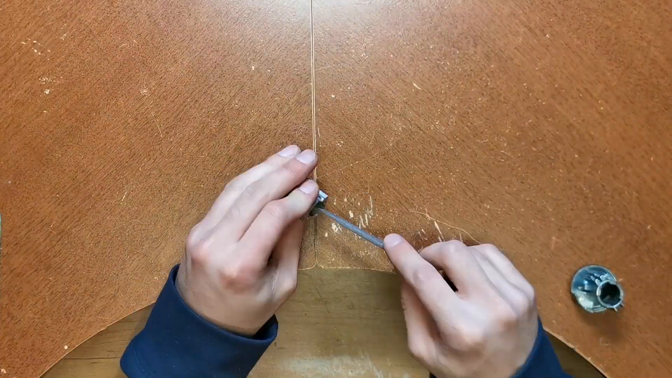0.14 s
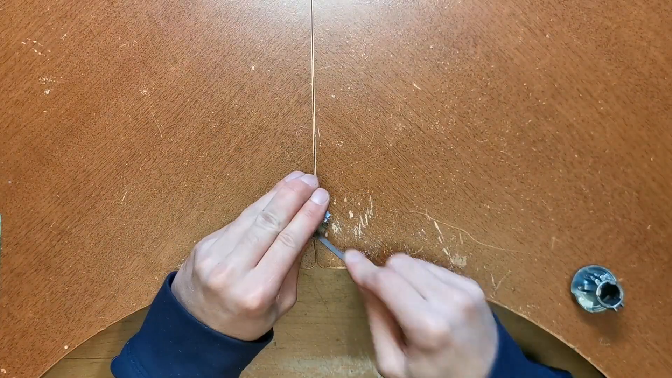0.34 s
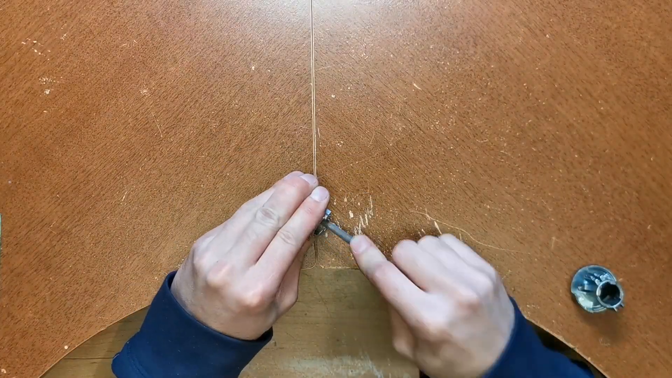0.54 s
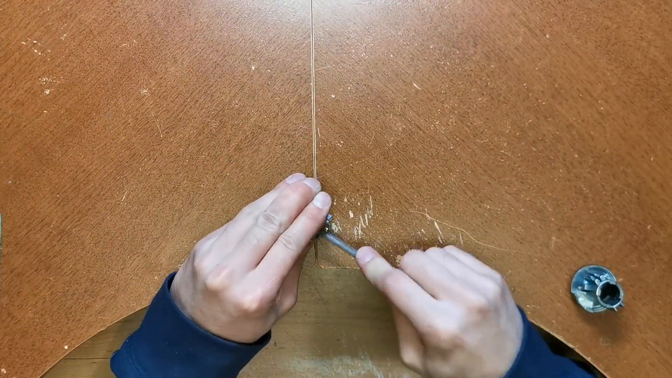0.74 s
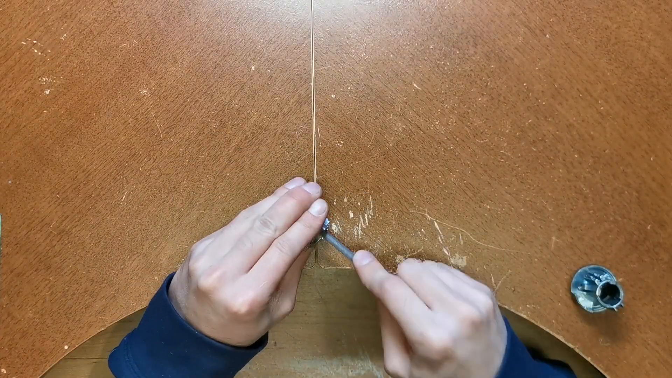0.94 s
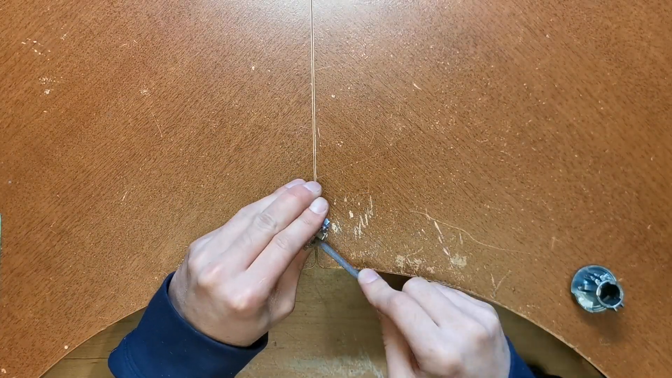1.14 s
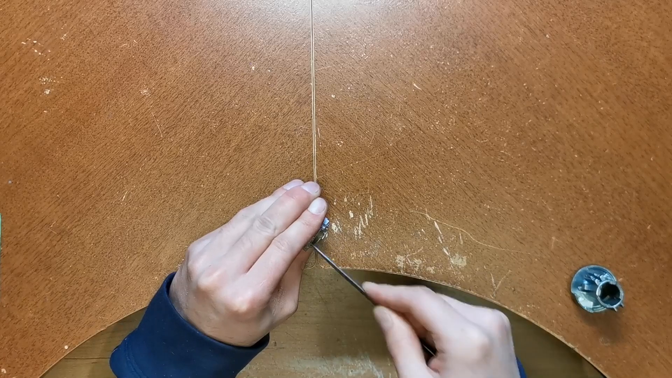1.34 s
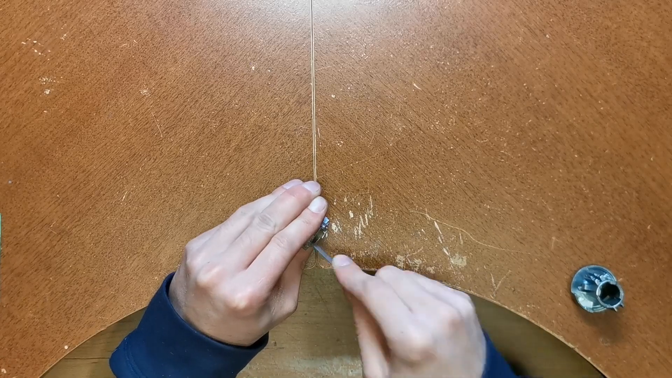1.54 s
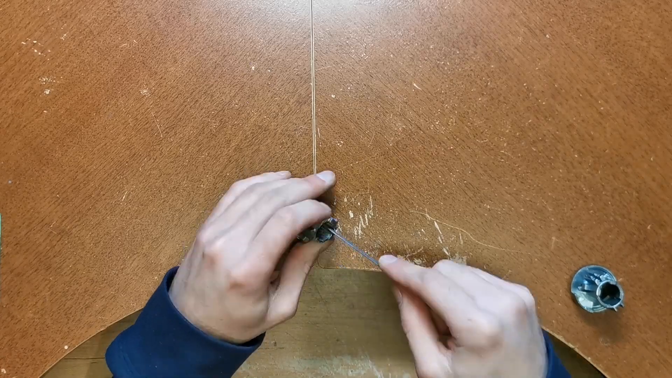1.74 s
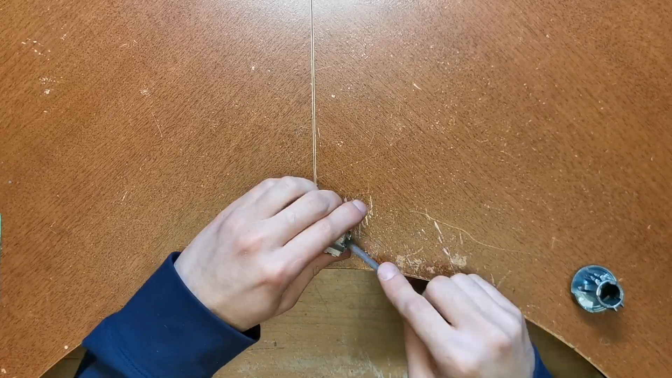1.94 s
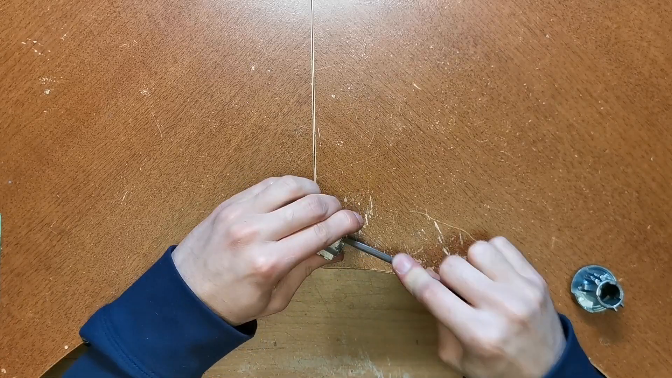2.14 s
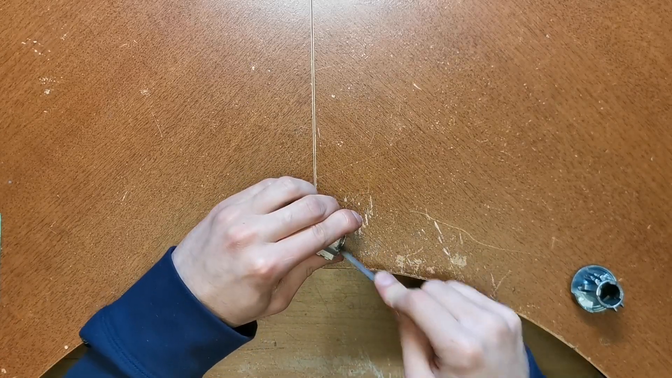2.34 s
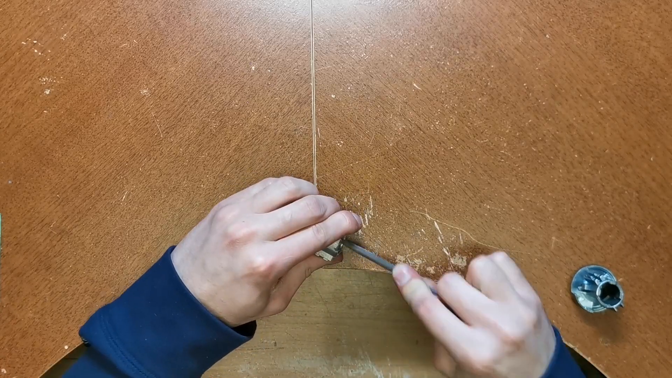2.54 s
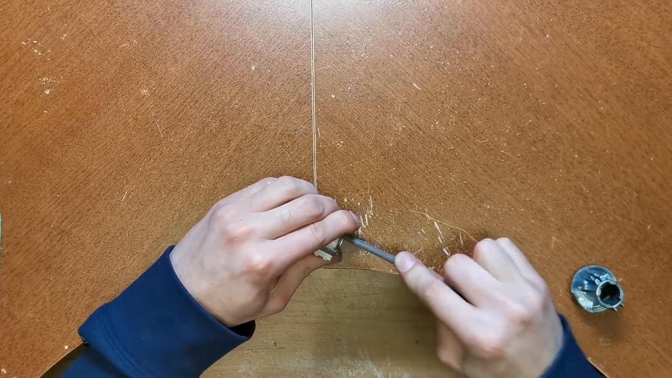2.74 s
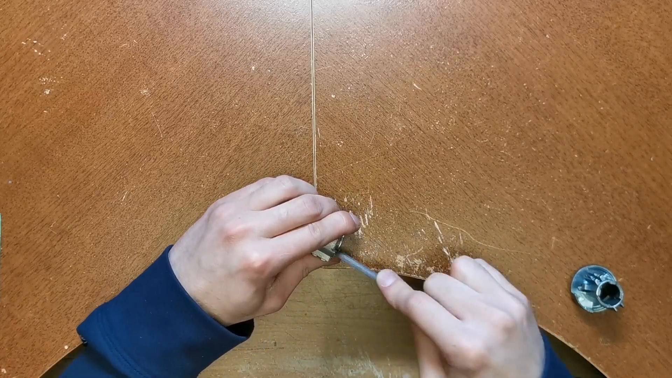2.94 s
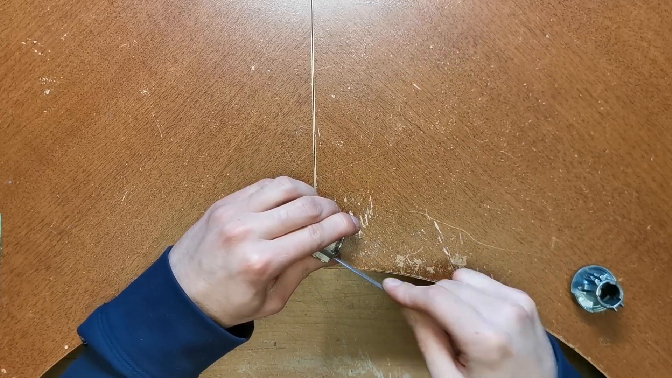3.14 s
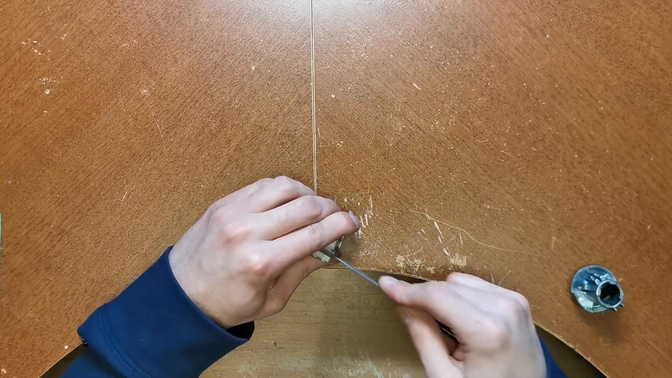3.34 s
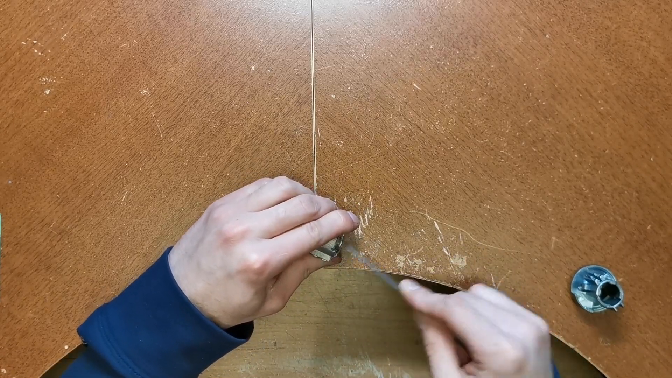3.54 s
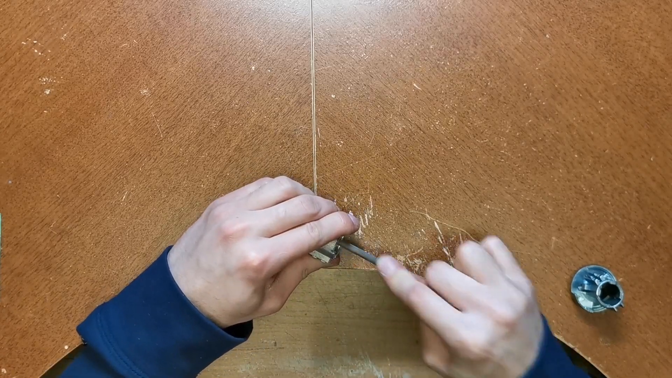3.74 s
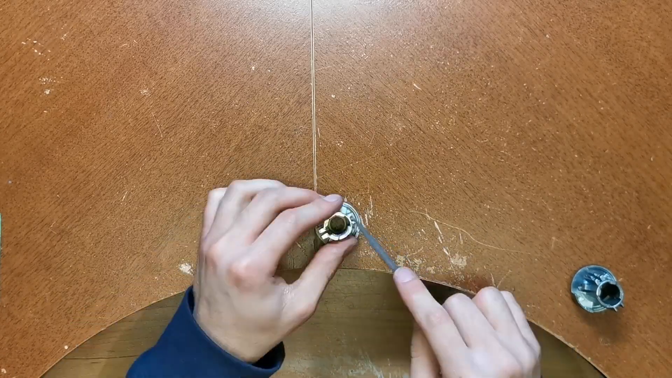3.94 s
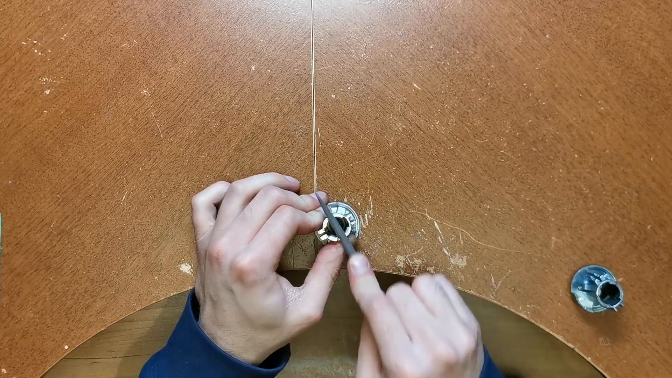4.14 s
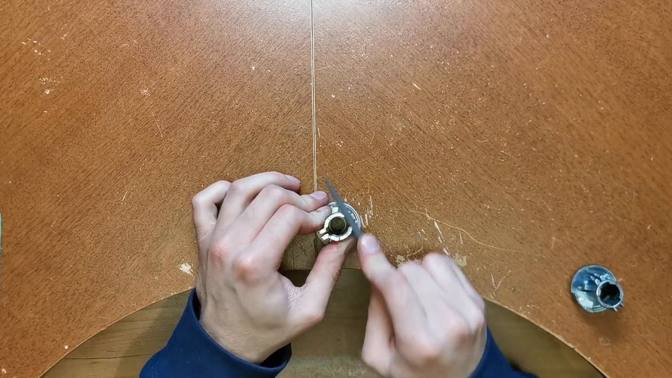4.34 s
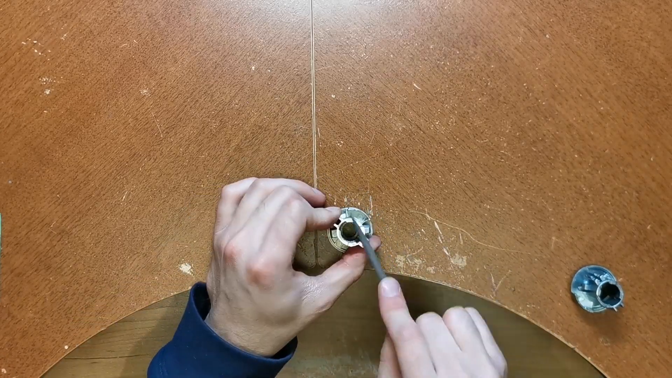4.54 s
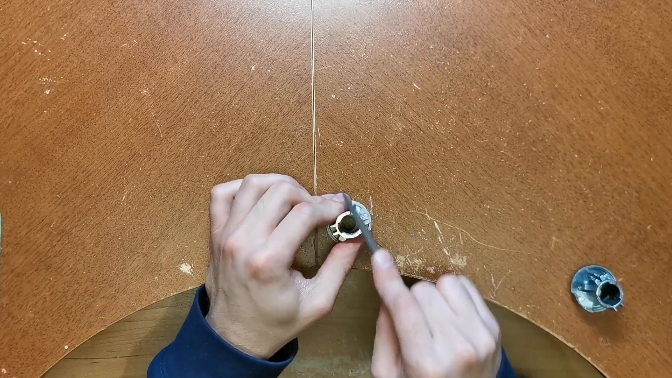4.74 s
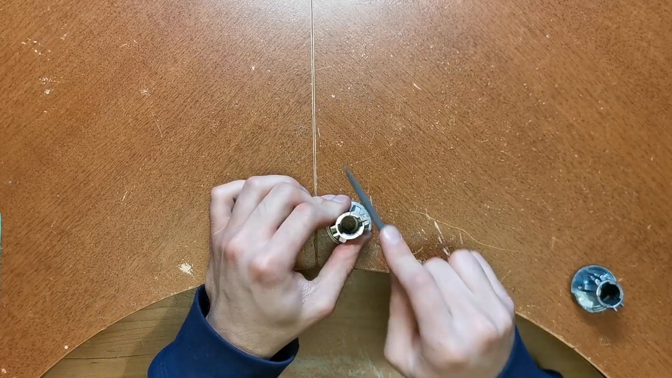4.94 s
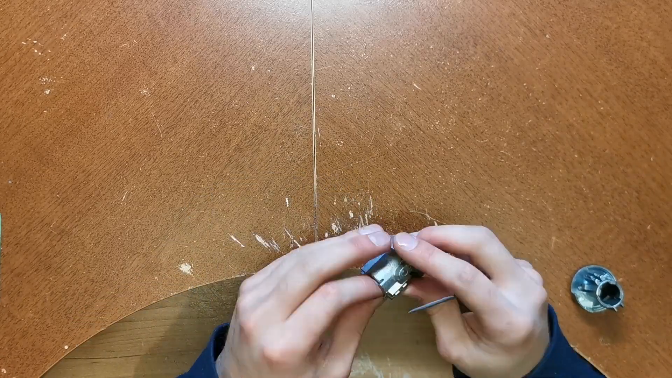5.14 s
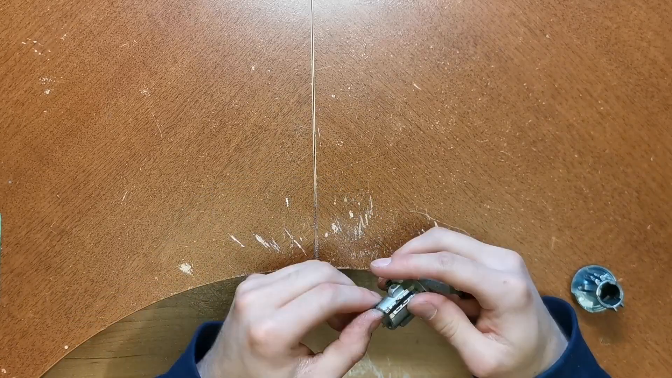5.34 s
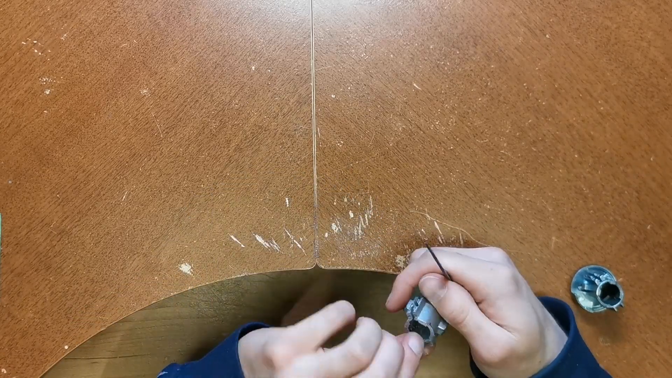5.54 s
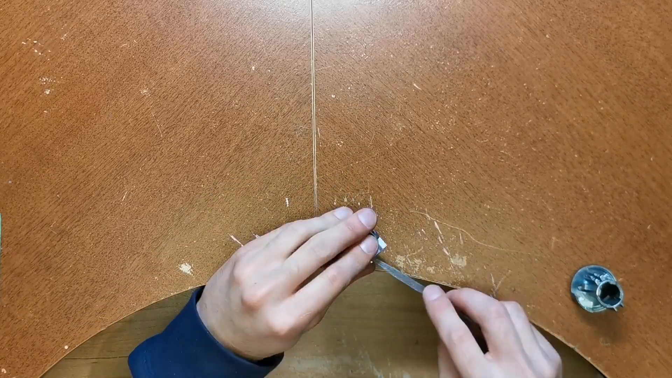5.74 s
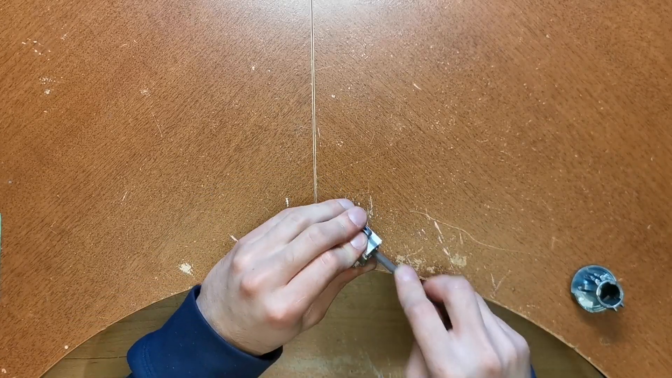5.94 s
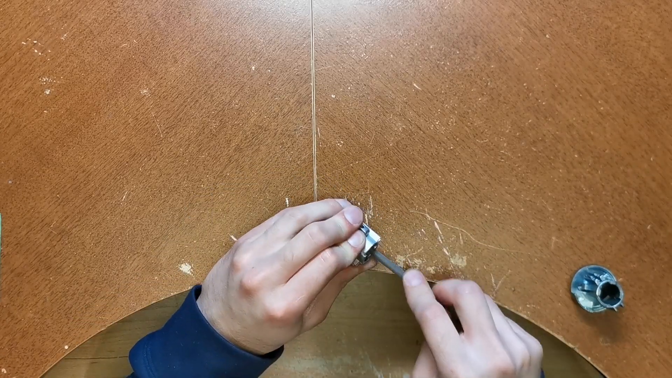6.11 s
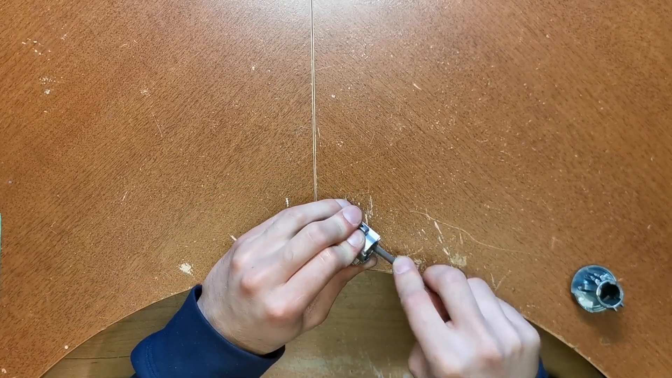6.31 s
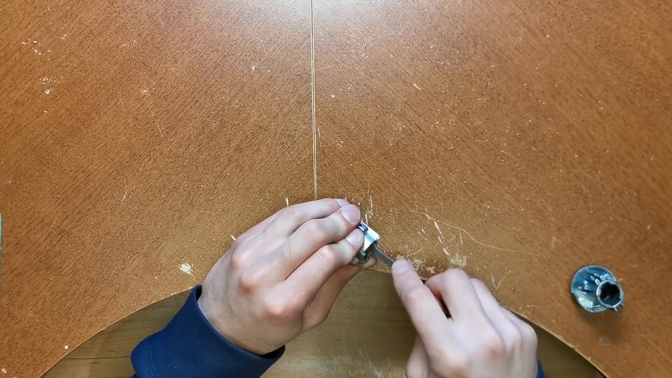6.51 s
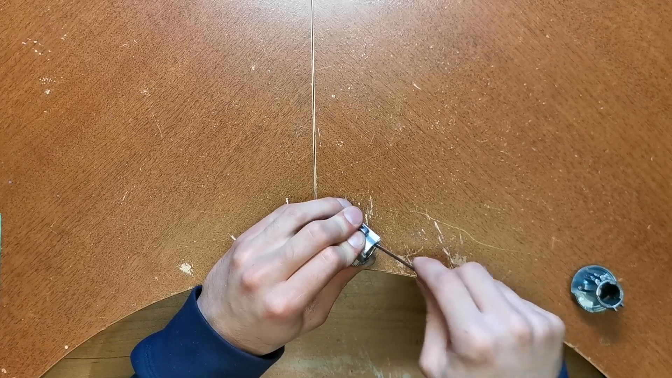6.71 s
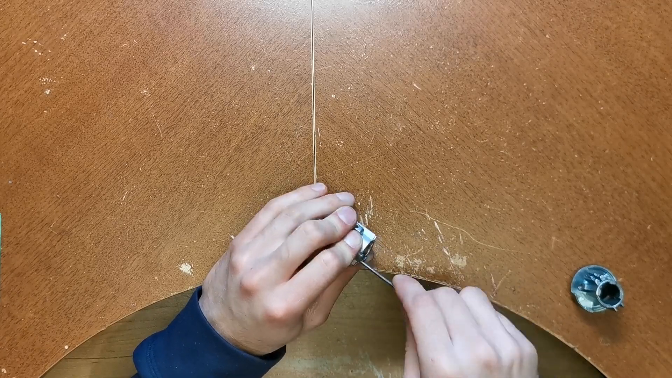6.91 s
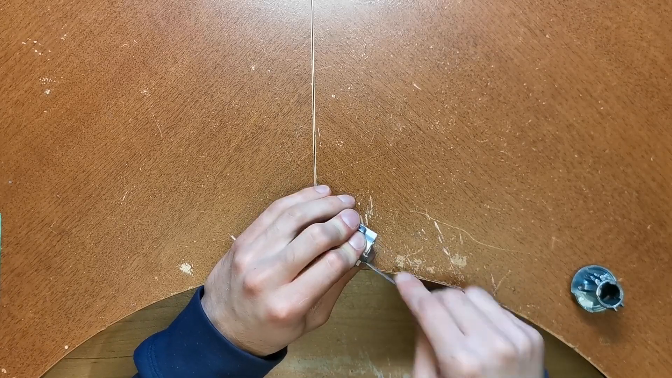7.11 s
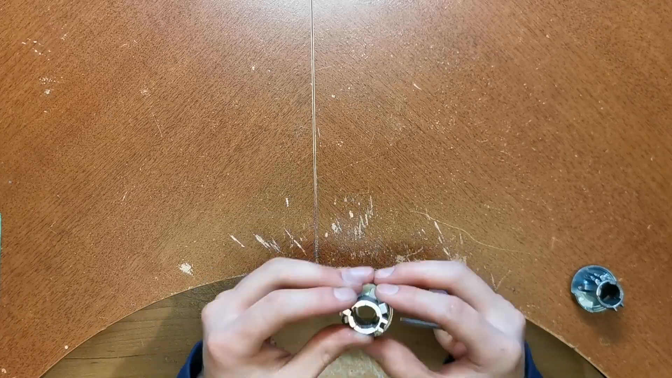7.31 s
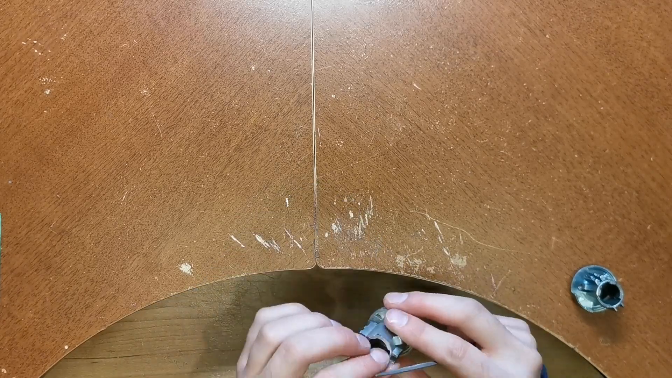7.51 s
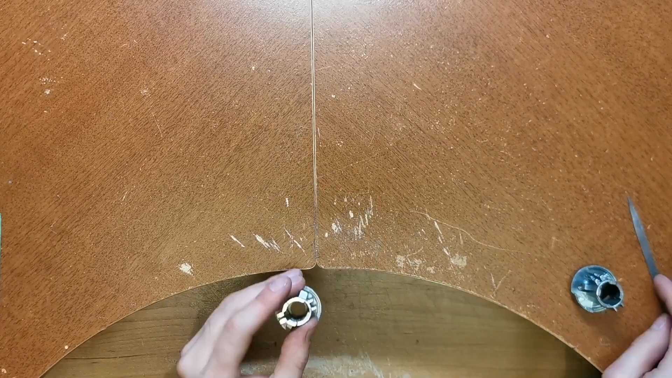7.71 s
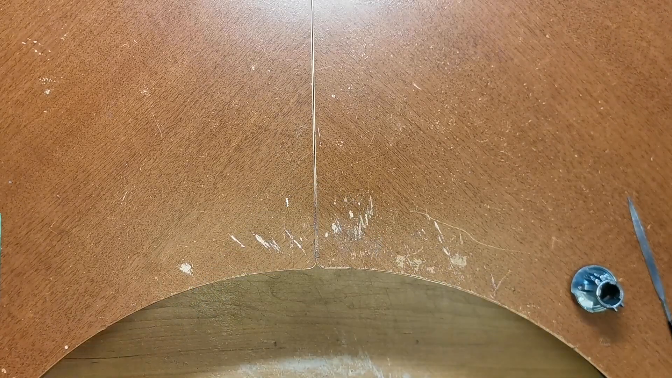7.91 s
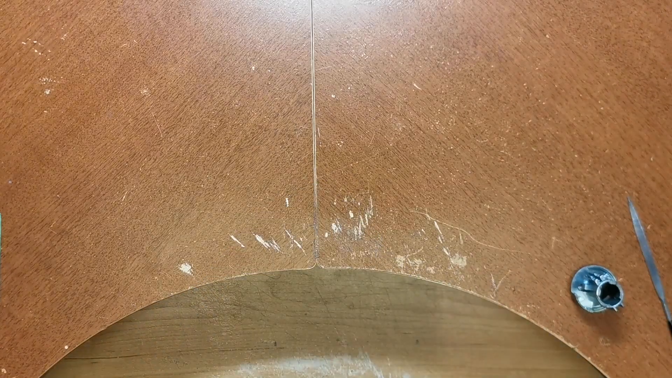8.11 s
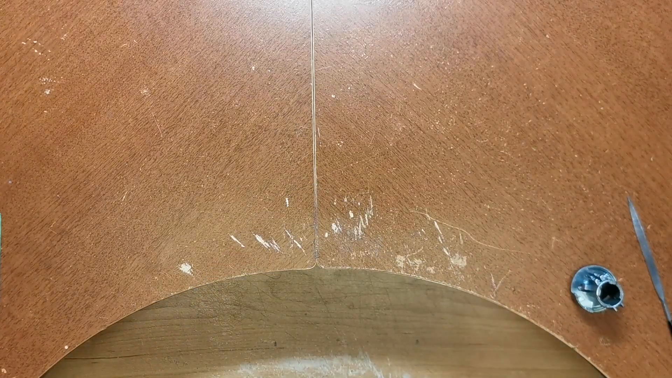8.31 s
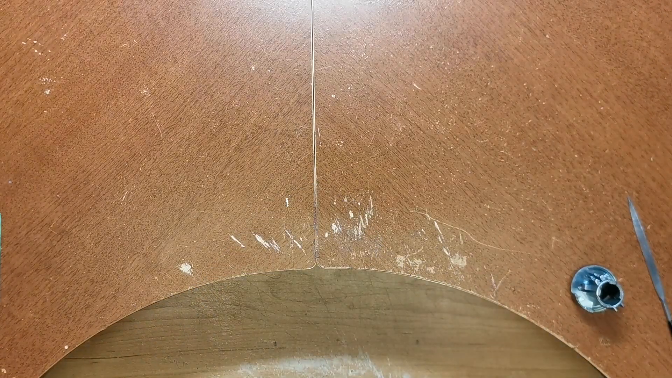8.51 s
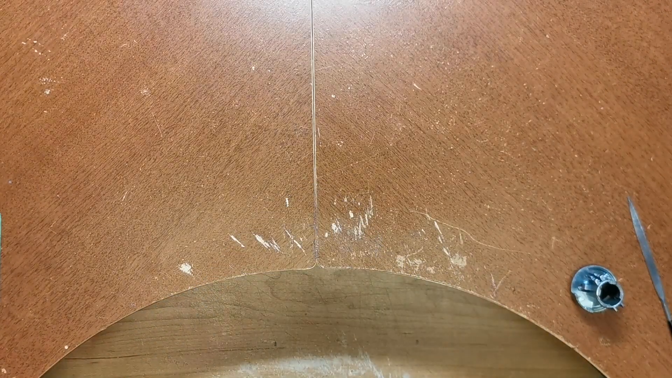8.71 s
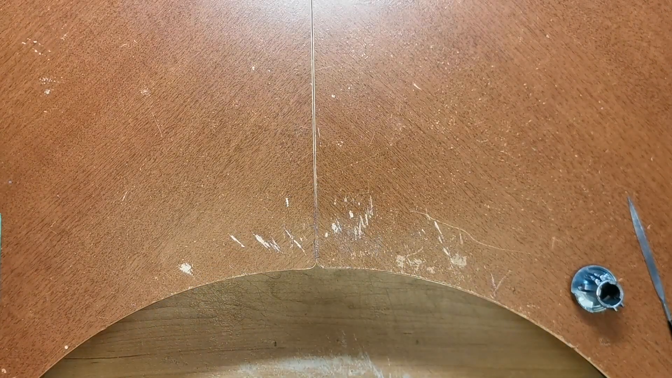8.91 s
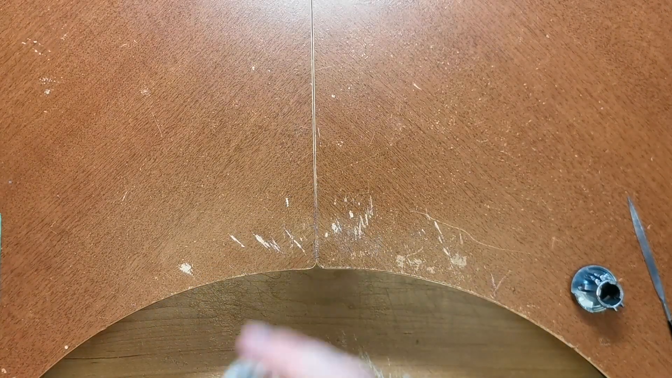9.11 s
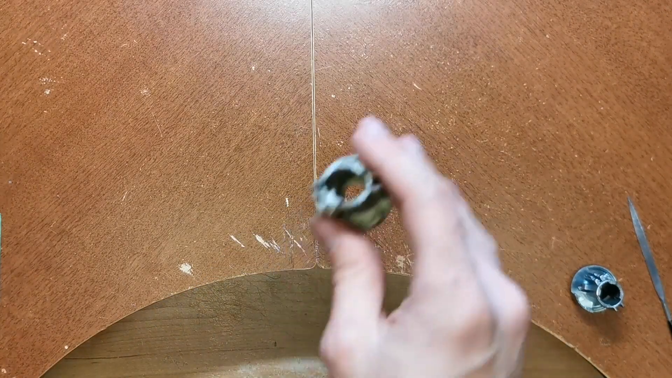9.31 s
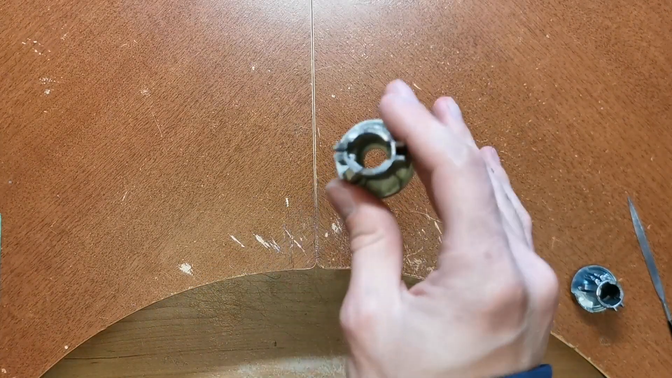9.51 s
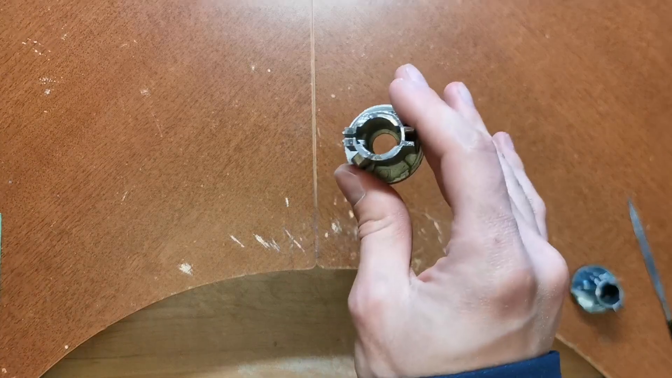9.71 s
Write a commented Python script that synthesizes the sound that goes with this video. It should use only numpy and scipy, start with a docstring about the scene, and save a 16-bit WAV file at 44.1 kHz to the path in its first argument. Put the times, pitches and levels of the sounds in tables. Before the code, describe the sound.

In a quiet workshop, a hand file scrapes a small metal part held on a wooden bench. Uneven short strokes chatter and rasp, edges catch, and the file taps the steel between grips. After a pause around five seconds, softer strokes resume. Light clicks and a knock end the work, leaving faint background air. Close stereo microphone, little room sound.

```python
"""A quiet workshop hum and a soft rustle come first, then a bump on the wooden bench and a tap on metal.
Close to the two microphone ports, a small hand file scrapes over a metal part in five grips on the bench.
Clusters of tooth impacts chatter about seventy times a second, ringing bench and steel; edges catch and squeak.
Single blows make the taps, light clicks and closing knock; shaped noise makes bumps and rustles.
The background is coloured noise with wavering tones; near the end its level dips and a low rumble replaces it."""
import sys
import numpy as np
from scipy import signal
from scipy.fft import rfft, irfft, next_fast_len
from scipy.io import wavfile
from scipy.ndimage import uniform_filter1d

SR = 44100
rng = np.random.default_rng(int(sys.argv[2]) if len(sys.argv) > 2 else 0)


def generate_wav(signal):
    """Clip the signal to [-1, 1] and save it as 16-bit WAV at the path in sys.argv[1]."""
    frames = np.transpose(np.atleast_2d(signal))
    scaled = np.clip(frames, -1, 1) * 32767
    pcm = np.round(scaled).astype(np.int16)
    wavfile.write(sys.argv[1], SR, pcm)


N = 430416
BODY_SAMPLES = 4096
HZ = np.fft.rfftfreq(BODY_SAMPLES, 1 / SR)

# colour of the workshop's air: frequency_hz, density_db_per_hz
AIR_COLOUR = [(12, -39), (20, 3.5), (32, -22.5), (262, -15), (301, -6), (347, -22.5), (472, -11.5),
              (873, -12.5), (1090, -13.5), (1400, -23), (1810, -18), (2460, -28.5), (3250, -22),
              (3630, -24), (16000, -31.5)]
# colour of the later rumble: frequency_hz, density_db_per_hz
RUMBLE_COLOUR = [(12, -38), (20, -10), (120, -6), (150, -11.5), (168, -34.5), (228, -13), (270, -31),
                 (388, -20.5), (624, -27), (1610, -35.5), (2140, -34), (7730, -44), (8890, -34.5),
                 (9950, -37.5), (16000, -44)]
# steady tones of the workshop: pitch_hz, rms_db
HUM_TONES = [(145.3, -89), (479.1, -82.5), (1071, -76.5), (1873, -88), (3321, -93)]
AIR_DRIVE_DB, RUMBLE_DRIVE_DB = -71.5, -68
CHANGE_S = 8.82  # hum gives way to rumble

# likeness of the two microphone ports: frequency_hz, shared_amplitude (0 to 1)
PORT_LIKENESS = [(60, 0.38), (240, .5), (500, 0.78), (950, 1), (2000, 1), (4000, .72), (8000, 0.35),
                 (15000, .44)]
# level difference of the ports: frequency_hz, left_minus_right_db
PORT_LEAN = [(60, 3.5), (99, -4), (160, 0.5), (270, -0.5), (450, -3), (740, -2.5), (1220, 0), (2010, 0.5),
             (3330, 2.0), (5500, 3.5), (9080, 5), (15000, 1)]
# phase by which the right port trails: frequency_hz, phase_rad
PORT_PHASE = [(500, 0.23), (2000, 0.97), (4000, 0.75), (7000, 1.12), (10000, 1.6), (15000, 1.5)]
# decay of the room: frequency_hz, t60_s
ROOM_DECAY = [(150, 0.29), (1000, 0.87), (3000, 0.4), (8000, 0.072), (16000, 0.16)]
# echoes from nearby surfaces: delay_s, level_db
NEARBY_ECHOES = [(.0045, -27.5), (.0085, -24.5), (0.011, -31.5), (0.013, -33.5)]
RECORDER_EDGE_HZ = 15950

# soft bumps on the bench: start_s, pitch_hz, peak_db, t60_s
BENCH_BUMPS = [(0.093, 756, -45.5, 0.024), (4.975, 64.2, -55, .05), (5.428, 141.2, -54.5, 0.15),
               (8.169, 78, -60, 0.023), (8.601, 232, -59, 0.11), (8.769, 228, -57.5, 0.067),
               (9.241, 201, -55, 0.15), (9.471, 191, -54, 0.24)]
# hands and sleeves rustle: start_s, length_s, drive_db
HAND_RUSTLES = [(0, .14, -67), (0.138, 0.085, -52.5), (.83, .12, -61), (1.84, .17, -60.5), (3.87, .1, -71),
                (5.02, .06, -62), (7.773, 0.33, -70.5), (8.577, 0.14, -69), (8.731, 0.08, -69),
                (9.217, .17, -75.5), (9.458, .34, -70)]
# colour of a rustle: frequency_hz, density_db_per_hz
RUSTLE_COLOUR = [(180, -48), (300, -3), (537, -12), (614, -4), (961, -4), (1010, -10), (1170, -9),
                 (1810, -8), (8940, -14), (16000, -12.5)]
# a sleeve slides off the bench edge: start_s, length_s, drive_db
SLEEVE_SLIDE = (7.61, .5, -70)
RUB_FADE_DB = -1  # from start to end of a rub

# Four tables of blows, levels before the trims in scene():
# start_s, level_db, low_over_level_db, top_over_level_db
# metal is set down with a knock
KNOCKS = [(8.1755, -38.5, -6, 8.5), (8.1815, -38, -5.5, 8.5)]
# the part clicks as it is turned in the fingers
PART_CLICKS = [(7.7817, -33, -6.5, 1.5), (7.829, -51.5, 2, -20), (7.8805, -44.5, 3.5, 5),
               (7.8904, -61, 5, 0), (7.9089, -35.5, -1, -2.5), (8.739, -66.5, 13, -13),
               (9.238, -71.5, 6, -12), (9.4744, -66, 3.5, -12)]
# the teeth catch on an edge
EDGE_CATCHES = [(0.305, -49, 7, -20), (0.3305, -31, -12.5, 2), (0.416, -24, -10, -1.5),
                (0.5045, -20, -25, -3.5), (0.759, -34.5, 0, 7), (1.124, -35.5, -2, 5.5),
                (1.7118, -31.5, -15, -14), (1.744, -24, -4, -12), (2.098, -39.5, 3.5, -6),
                (2.3975, -33, 4.5, -14), (2.4543, -22.5, -13, -13), (2.4824, -29.5, -1.5, -7),
                (2.693, -36, 5, 0), (3.173, -39.5, 2, 3), (3.1936, -35, -1, 2), (3.272, -28, -14, -11),
                (3.354, -42.5, 1, 4), (3.617, -38, -7, -7), (3.754, -34.5, -9, -1), (3.843, -36, 4, -4),
                (4.0987, -28, -26, 7.5), (4.212, -28.5, -12.5, -6), (4.4512, -23, -14.5, -5),
                (4.7112, -20.5, -8.5, 0), (4.7445, -25.5, -12, 1.5), (4.846, -26.5, -18, -2),
                (4.8564, -26, -17.5, -1), (4.91, -29.5, -9, -2), (4.9404, -22, -18, -6),
                (4.98, -27.5, -17, 1), (5.002, -23.5, -7.5, -2), (5.0094, -25, -5, -0.5),
                (6.017, -35, -13, 3), (6.357, -39, 5.5, -6), (6.7324, -38, 3.5, -15.5),
                (6.769, -25.5, -20, -6), (6.8027, -31, -9, -6), (6.913, -32, -6, -1), (7.106, -44, -1, -10),
                (7.1953, -39, 6, -17), (7.2285, -30, -15, -8)]
# the file taps the part
FILE_TAPS = [(0.182, -28.5, 0, -13), (0.1924, -48, -1.5, -16), (0.5748, -24, -21, 3.5),
             (0.8686, -45.5, 3.5, 4), (0.925, -58.5, 2, 1), (1.1877, -28.5, -6.5, -1), (1.8149, -23, 0, -4),
             (1.85, -41.5, -5, 5.5), (1.8919, -42, 3, 3.5), (1.9088, -38, -4, 5.5), (1.9864, -22, 1, -13),
             (2.8745, -40, -8, 5.5), (3.0215, -35.5, 2, 8), (3.339, -34, -5, 2.5), (3.601, -33, 0.5, -7.5),
             (3.9978, -20.5, -1.5, -4.5), (4.019, -21.5, -6.5, -3), (4.06, -42, -16, -4),
             (4.1999, -33.5, -12.5, -6.5), (4.6803, -22, -6, -4.5), (4.8052, -22.5, -7, -10),
             (5.7754, -18, -1.5, -13), (5.8384, -46, -24, -2), (6.1518, -48, -7, -4),
             (7.3233, -47, 12.5, -21.5)]
# colours of knock, click, and bench and steel under a tap: frequency_hz, density_db_per_hz
KNOCK_COLOUR = [(30, -6), (90, -4), (180, -17), (550, -18), (940, -5), (1160, -17), (1500, -6), (2500, -13),
                (6200, -9), (13000, -5.5), (14800, -1), (16000, -6.5)]
PART_CLICK_COLOUR = [(240, -51), (400, -32), (893, -0.5), (1650, -2), (1930, 4.5), (2150, 0), (3020, -6.5),
                     (3810, -4), (4880, -11), (5270, 0), (5690, -11.5), (8630, -5), (12300, -15),
                     (14800, -4.5), (16000, -27)]
TAP_BENCH_COLOUR = [(60, -32.5), (180, -23.5), (290, -21.5), (450, -13), (700, -2), (930, 4), (1130, 1.5),
                    (1540, -23), (1880, -9.5), (2400, 1), (2730, -14.5), (3120, 1), (3400, -9.5),
                    (4420, -27)]
TAP_STEEL_COLOUR = [(1590, -42), (2700, -13.5), (3230, -6.5), (3580, -10), (4480, -1.5), (5050, -10.5),
                    (5940, -1), (6700, -2), (8130, -11), (9640, -5.5), (10800, -7.5), (12000, -8),
                    (16000, -17.5)]

# edges between low, middle and top bands: frequency_hz
BAND_EDGES_HZ = (3000, 8000)
# hollows where the echo off the bench top cancels: centre_hz, width_hz, gain_db
BENCH_TOP_HOLLOWS = [(1610, 62, -2.5), (3644, 66, -7.5), (5200, 130, -2.5), (8210, 130, -2.5),
                     (10200, 170, 0)]
# the part on the bench, in each grip: frequency_hz, density_db_per_hz
BENCH_GRIP_1 = [(35, -46.5), (60, -19.5), (213, -13), (289, -25.5), (385, -19.5), (455, -11.5), (513, -14),
                (795, -8), (910, -2), (1410, -19.5), (1560, -21), (2010, -10.5), (2270, -7.5),
                (2820, -17.5), (3400, 3), (4420, -40), (7480, -120)]
BENCH_GRIP_2 = [(35, -64), (60, -20.5), (192, -13), (224, -12), (330, -18.5), (455, -9.5), (756, -5.5),
                (942, 0.5), (1190, -9.5), (1540, -21.5), (1980, -4), (2270, -4), (2430, -0.5), (2730, -20),
                (3400, 7), (4420, -36), (7480, -120)]
BENCH_GRIP_3 = [(35, -62), (60, -22), (144, -15.5), (325, -20.5), (448, -13), (513, -16.5), (837, -3),
                (926, 1), (1210, -11), (1540, -25.5), (1760, -15), (2050, -11), (2380, -9), (2730, -24.5),
                (3400, -13), (4420, -47.5), (7480, -120)]
BENCH_GRIP_4 = [(35, -60.5), (60, -17), (108, -23.5), (144, -12.5), (196, -22), (252, -12), (325, -20),
                (463, -8), (743, -7.5), (958, -1), (1190, -8), (1320, -19), (2310, -5), (2680, -13.5),
                (3400, -10), (4420, -38), (7480, -120)]
BENCH_GRIP_5 = [(35, -84), (60, -33), (144, -15.5), (336, -24), (440, -14), (719, -8), (958, 1.5),
                (1170, -10), (1300, -19.5), (1510, -27), (1790, -14), (1980, -18), (2340, -7.5),
                (2730, -21), (3400, -33.5), (4420, -51), (7480, -120)]
# the steel of file and part, in each grip: frequency_hz, density_db_per_hz
STEEL_GRIP_1 = [(1590, -43), (2700, -13), (3160, -14), (3560, -15), (3860, -6), (4130, -9.5), (5240, -7.5),
                (6450, -1), (7540, -6.5), (7950, -12.5), (9500, -1.5), (10200, -7.5), (13100, -8),
                (15100, -1), (16000, -9)]
STEEL_GRIP_2 = [(1590, -46), (2700, -18.5), (3090, -17), (3580, -10), (3860, -9.5), (4790, -8.5),
                (5200, -10.5), (5680, -4.5), (6220, -1.5), (7600, -9.5), (8010, -13.5), (9500, -12),
                (13200, -16), (15100, -7), (16000, -19)]
STEEL_GRIP_3 = [(1590, -36), (2700, -16.5), (3400, -12), (3580, -8), (3830, -6.5), (4250, -8), (4830, -5),
                (5240, -7.5), (5990, -3), (6700, -5), (8130, -15), (10800, -11), (12100, -16.5),
                (13500, -12), (16000, -19)]
STEEL_GRIP_4 = [(1590, -46.5), (2700, -14.5), (3200, -11.5), (3580, -11), (4040, -4.5), (5120, -7),
                (5900, -1), (6360, 2), (7430, -6), (9640, -1), (10800, -8.5), (12100, -8), (13400, -15),
                (15100, -9.5), (16000, -26.5)]
STEEL_GRIP_5 = [(1590, -69), (2700, -6.5), (3110, -14.5), (3660, -18.5), (4010, -13), (4380, -10),
                (5050, -13.5), (6030, -2.5), (6800, -5), (8130, -13), (9430, -9.5), (10400, -16),
                (13000, -16.5), (15100, -12), (16000, -19.5)]
# beginning of each grip: start_s
GRIP_START_S = (0, .9, 2, 4, 5.7)
# place of the steel in each grip: left_minus_right_db
STEEL_PAN_DB = [0.83, -.5, -0.27, 0.55, -0.86]
# central chatter rate in each grip: slips_hz
CHATTER_HZ = [70, 69.34, 68.9, 72, 65.96]

# the file squeaks on the rim: start_s, pitch_hz, drive_db, length_s
RIM_SQUEAKS = [(4.481, 2430, -41, 0.018), (4.483, 1020, -48, 0.02), (4.532, 2396, -41.5, 0.03),
               (4.767, 2400, -49, 0.02), (5.78, 2520, -47.5, 0.012)]
# pushes and pulls, levels before the trims in stroke(): start_s, length_s, rasp_db,
# bench_over_rasp_db, fizz_over_rasp_db, pressure_gain_start_to_end_db, mid_stroke_swell_db,
# fizz_brightening_start_to_end_db
FILE_STROKES = [(0.221, 0.088, -57, -4.5, -6, -2, -7.5, -0.5), (0.319, 0.353, -36.5, -6.5, 0, 1.5, 2.5, -1),
                (0.65, 0.2, -42.5, -3, 0.5, -8, 5.5, -1), (0.943, 0.16, -43.0, -2.0, -1.5, 1.0, -1, -0.5),
                (1.094, 0.075, -43, -3.5, -4, -8, -4, 4.5), (1.168, 0.47, -37.5, -5, -5.5, 4.5, 7, -7.5),
                (1.589, 0.25, -40.5, -3, -5.5, 1, 1.5, -2.5),
                (2.018, 0.26, -45.0, 0.5, -6, 4.5, -1.5, -0.5), (2.269, 0.46, -42, -1.5, -6, -4, 1, 1),
                (2.724, 0.17, -47.5, 3.5, -7.5, 3.5, -8, -10),
                (2.894, 0.16, -49.0, 3.5, -4.0, -4.0, 6.5, -5), (3.04, 0.19, -44.5, -2, -2, -6.5, 5.5, 2),
                (3.225, 0.14, -44, 2, -7, -3, -2.5, 0.5), (3.392, 0.22, -50.5, 3.5, -5.5, -1.5, 5.5, -2),
                (3.577, 0.059, -43.5, -1.5, -6, 2.5, -4.5, 7), (3.678, 0.2, -46, -0.5, -5.0, -3.5, 0.5, 0),
                (4.043, 0.067, -51.5, -10, -6.0, 9, -3, 6), (4.09, 0.098, -33, -15.5, -1.5, 0.5, -1, -4),
                (4.202, 0.28, -38.5, -10.5, -2.5, -8.5, 4, -2), (4.471, 0.036, -42.5, -4, -7, 3, 1, -1.0),
                (4.527, 0.053, -44.5, -6.5, -9.5, -8, -5, -1.0),
                (4.608, 0.084, -40, -10.5, -1.0, 15, -1.5, -8),
                (4.74, 0.049, -41, -4.5, -11, -2, 1.5, -2.5),
                (4.807, 0.082, -35.5, -13.0, -5.5, -3.5, 1, -1),
                (4.893, 0.071, -39, -9.5, -4.5, 4.5, -17, -2.5),
                (4.968, 0.063, -43.5, -0.5, -14, -14, -19, 0.5),
                (5.861, 0.073, -57, -9.5, -4, 11.0, -1, 3.0), (5.962, 0.15, -46, -2.5, -2.0, 2.0, 10.5, -6),
                (6.154, 0.067, -45, 2, -2, -6, 8.5, 6), (6.205, 0.33, -47, 0.5, -2.5, 7.5, 8, 9),
                (6.511, 0.15, -47, -2.0, -2, 4.5, 14, 9), (6.655, 0.28, -43, -2, -4, -2, 7, 4),
                (6.961, 0.064, -45.5, -8, -3.5, 14, -6.5, -1.0),
                (7.003, 0.32, -42.5, -2.5, -3, -1.5, -1, 1.5)]
BITE_S, LIFT_S = .016, .02  # the teeth bite, and lift off at the turn
BENCH_LEAN, BENCH_SWELL, FIZZ_SWELL = .6, .7, .92  # shares of the pressure and the swell
TREMOR_DB, TREMOR_HZ = .48, 18  # the hand does not press evenly
ROCK_DB, ROCK_HZ = 1.5, 94.7  # the part's hold on the bench varies
SLIP_FIZZ_DB = .5  # stronger slips are brighter
CHATTER_DEPTH_PER_DB, USUAL_RASP_DB = -.0277, -43.5  # louder strokes chatter less deeply
DRIFT, DRIFT_HZ = .03, 8  # slow changes of chatter speed, as a share of its rate


def gain_of(db):
    """Decibels to gain."""
    return 10 ** (np.asarray(db) / 20)


def evened(x):
    """Scales to rms 1."""
    return x / np.sqrt(np.mean(x ** 2) + 1e-20)


def read(points, hz):
    """Reads a table on a log-frequency axis."""
    f, value = np.transpose(points)
    return np.interp(np.log(hz + 1), np.log(f + 1), value)


def add(mix, start_s, sound):
    """Adds a stereo sound at its start time."""
    part = mix[:, max(round(start_s * SR), 0):][:, :sound.shape[1]]
    part += sound[:, :part.shape[1]]


def wander(size, hz):
    """Random curve around 0 with a spread of about 1, joining hz new values a second by lines."""
    at = np.arange(size) * hz / SR
    knots = np.arange(int(at[-1]) + 2)
    return np.interp(at, knots, 1.21 * rng.standard_normal(len(knots)))


def held(t, length, attack_s, release_s):
    """Envelope that rises, holds and falls to zero at the given length."""
    return np.clip(np.minimum(t / attack_s, (length - t) / release_s), 0, 1)


def ring(x, gain, band=1):
    """Rings a minimum-phase body, cut to a band and scaled to unit energy."""
    log_gain = np.log(np.maximum(gain / gain.max(), 1e-4))
    mirrored = np.r_[log_gain, log_gain[-2:0:-1]]
    response = np.exp(np.conj(signal.hilbert(mirrored)))[:len(HZ)]
    body = np.roll(irfft(response * band), 64)  # room for ringing ahead of the peak
    body = body[None] / np.linalg.norm(body)
    return signal.fftconvolve(x, body, axes=1)[:, 64:]


def workshop(width=.73, waver=.002):
    """Steady air noise with wavering tones; after a brief level dip only low rumble noise is left."""
    t = np.arange(N) / SR
    mid, side = rng.standard_normal((2, N))
    noise = np.array([mid + width * side, mid - width * side])
    hum = np.zeros(N)
    for hz, rms_db in HUM_TONES:
        cycles = np.cumsum(hz * (1 + waver * wander(N, 40))) / SR
        hum += gain_of(rms_db) * np.sqrt(2) * np.sin(2 * np.pi * cycles)
    air = gain_of(AIR_DRIVE_DB) * ring(noise, gain_of(read(AIR_COLOUR, HZ)))[:, :N]
    rumble = gain_of(RUMBLE_DRIVE_DB) * ring(noise, gain_of(read(RUMBLE_COLOUR, HZ)))[:, :N]
    dip = np.clip(abs(t - CHANGE_S) / .011 - 1, .08, 1)
    return np.where(t < CHANGE_S, air + hum, rumble) * dip


def room(x):
    """A short tail of sparse reflections, each frequency dying at its own speed."""
    size = SR // 2
    reflections = rng.standard_normal((2, size)) * (rng.random((2, size)) < .08)
    reflections *= np.arange(size) > .004 * SR
    hz, t, z = signal.stft(reflections, SR, nperseg=256)
    tail = signal.istft(z * gain_of(-60 * t / read(ROOM_DECAY, hz)[:, None]), SR)[1]
    return signal.fftconvolve(x, tail / np.linalg.norm(tail[0]), axes=1)[:, :N]


def echoes(x):
    """Nearby surfaces throw the sound back to the opposite port."""
    out = np.zeros((2, N))
    for delay_s, db in NEARBY_ECHOES:
        add(out, delay_s, gain_of(db) * x[::-1])
    return out


def shifting(size, patch_db=2.5):
    """Noise in which small patches of time and frequency grow stronger and weaker."""
    z = signal.stft(rng.standard_normal((2, size + 512)), nperseg=512)[2]
    patches = uniform_filter1d(rng.standard_normal(z.shape[1:]), size=4, axis=0)
    patches = evened(uniform_filter1d(patches, size=3, axis=1))
    return evened(signal.istft(z * gain_of(patch_db * patches))[1][:, :size])


def ports(force, crack=0):
    """Force as noise at both ports; crack is the energy share of one clean impact at its peak."""
    size = next_fast_len(len(force) + 256)
    hz = np.fft.rfftfreq(size, 1 / SR)
    crack = np.clip(crack, 0, 1)
    grains = np.sqrt(1 - crack) * force * shifting(len(force))
    impact = np.exp(-2j * np.pi * hz * np.argmax(force) / SR)
    impact = np.sqrt(crack) * np.linalg.norm(force) * impact
    left, other = rfft(grains, size) + impact * np.array([[1], [1j]])
    same = np.clip(read(PORT_LIKENESS, hz), 0, 1)
    right = same * left + np.sqrt(1 - same ** 2) * other
    right = right * np.exp(-1j * read(PORT_PHASE, hz))
    lean = gain_of(read(PORT_LEAN, hz) / 2)
    delay = np.exp(-2j * np.pi * hz * 16 / SR)  # 16 samples
    return irfft(np.array([left * lean, right / lean]) * delay, size)[:, :len(force)]


def rub(row, colour, rise_s, release_s, grit_db):
    """Skin or cloth sliding: grainy noise that swells, fades and stops."""
    start, length, db = row
    t = np.arange(0, length, 1 / SR)
    level_db = db + RUB_FADE_DB * t / length + grit_db * wander(len(t), 148.6)
    force = gain_of(level_db) * held(t, length, rise_s, release_s)
    return start, ring(ports(force), colour)


def handling(sleeve_hz=680, sleeve_q=1.8, bump_q=3.6):
    """Soft bumps shake a bench resonance; sliding fingers and sleeves make coloured noise."""
    out, t = np.zeros((2, N)), np.arange(SR // 4) / SR
    for start, hz, peak_db, t60 in BENCH_BUMPS:
        resonance = 1 / (1 + (bump_q * (HZ / hz - 1)) ** 2)
        thud = ring(ports(gain_of(-60 * t / t60)), resonance)
        add(out, start, gain_of(peak_db) * thud / abs(thud).max())
    for row in HAND_RUSTLES:
        add(out, *rub(row, gain_of(read(RUSTLE_COLOUR, HZ)), rise_s=.02, release_s=.066, grit_db=1))
    sleeve_colour = 1 / (1 + (sleeve_q * np.log2((HZ + 1) / sleeve_hz)) ** 4)
    add(out, *rub(SLEEVE_SLIDE, sleeve_colour, rise_s=.05, release_s=.092, grit_db=-1))
    return out


def contact(force, levels_db, bench, steel, pan_db, crack=0):
    """Tooth impacts ring the bench (low), the steel (middle) and its finest fizz (top)."""
    low, below_top = (1 / (1 + (HZ / edge) ** 20) for edge in BAND_EDGES_HZ)
    bands = low, below_top - low, 1 - below_top
    hollows = sum(db / (1 + ((HZ - hz) / width) ** 2) for hz, width, db in BENCH_TOP_HOLLOWS)
    teeth, out = ports(force, crack), 0
    for band, db, colour, pan in zip(bands, levels_db, (bench, steel, steel), (0, pan_db, pan_db)):
        ringing = ring(teeth * gain_of(db), gain_of(read(colour, HZ) + hollows), band)
        out = out + ringing * gain_of([[pan / 2], [-pan / 2]])
    return out


def blow(rise_s, decay_s):
    """Force envelope of one blow, with the energy of 4 ms at level 1."""
    t = np.arange(SR // 12) / SR
    force = (1 - np.exp(-t / rise_s)) * np.exp(-t / decay_s)
    return force / np.linalg.norm(force) * np.sqrt(.004 * SR)


def hits(table, bench, steel, rise_s, decay_s, trim_db, pan_db, crack=0):
    """Single blows with a brief rise and decay; the fingers damp the metal at once."""
    out = np.zeros((2, N))
    for start, db, low, top in table:
        levels_db = np.array([db + low, db, db + top]) + trim_db
        add(out, start, contact(blow(rise_s, decay_s), levels_db, bench, steel, pan_db, crack))
    return out


def squeaks(width_hz=220):
    """Short rubs that ring one resonance of the rim."""
    out = np.zeros((2, N))
    for start, hz, db, length in RIM_SQUEAKS:
        force = signal.windows.hann(int(length * SR))
        resonance = 1 / (1 + ((HZ - hz) / width_hz) ** 2)
        add(out, start, gain_of(db) * ring(ports(force), resonance))
    return out


def stroke(row, bench, steel, pan_db, slip_hz, swing_db=5.5, bench_swing_db=.5, slip_db=1.5,
           uneven_db=1.48, grit_db=2.5, grit_hz=900, jitter=.022,
           bench_trim_db=.7, rasp_trim_db=-1, fizz_trim_db=-.6):
    """The file grips and slips in a fast chatter of tooth impacts, shaped by the hand's pressure."""
    start, length, db, low_db, top_db, lean_db, swell_db, bright_db = row
    t = np.arange(0, length, 1 / SR)
    size = len(t)
    along = t / length - .5  # place in the stroke, 0 halfway
    lean = lean_db * along
    swell = swell_db * (np.cos(np.pi * along) - 2 / np.pi)

    rate = 1 + jitter * wander(size, 78) + DRIFT * wander(size, DRIFT_HZ)
    slips = np.cumsum(slip_hz * rate) / SR
    chatter = .5 - 2 * np.cos(np.pi * slips) ** 4  # broad slips, brief rests
    chatter = chatter * (1 + CHATTER_DEPTH_PER_DB * (db - USUAL_RASP_DB))
    strength = rng.standard_normal(int(slips[-1]) + 1)[slips.astype(int)]  # no two slips are alike

    force_db = swing_db * chatter + slip_db * strength
    force_db = force_db + uneven_db * wander(size, 260) + grit_db * wander(size, grit_hz)
    force_db = force_db + TREMOR_DB * wander(size, TREMOR_HZ)
    force = evened(gain_of(force_db)) * gain_of(db) * held(t, length, BITE_S, LIFT_S)

    low = low_db + bench_trim_db + BENCH_LEAN * lean + BENCH_SWELL * swell
    low = low + (bench_swing_db - swing_db) * chatter  # the heavy bench follows the chatter less
    low = low + ROCK_DB * (wander(size, ROCK_HZ) - .5)  # the part rocks and jolts the bench
    rasp = rasp_trim_db + lean + swell
    fizz = top_db + fizz_trim_db + lean + FIZZ_SWELL * swell
    fizz = fizz + bright_db * along + SLIP_FIZZ_DB * strength
    return start, contact(force, (low, rasp, fizz), bench, steel, pan_db)


def filing():
    """All strokes, each with the colour, place and chatter of the grip in which it falls."""
    out = np.zeros((2, N))
    benches = BENCH_GRIP_1, BENCH_GRIP_2, BENCH_GRIP_3, BENCH_GRIP_4, BENCH_GRIP_5
    steels = STEEL_GRIP_1, STEEL_GRIP_2, STEEL_GRIP_3, STEEL_GRIP_4, STEEL_GRIP_5
    grips = list(zip(benches, steels, STEEL_PAN_DB, CHATTER_HZ))
    for row in FILE_STROKES:
        grip = grips[np.searchsorted(GRIP_START_S, row[0]) - 1]
        add(out, *stroke(row, *grip))
    return out


def scene():
    """File, part and hands close by on the bench, with the small room and workshop behind them."""
    knock = hits(KNOCKS, KNOCK_COLOUR, KNOCK_COLOUR,
                 rise_s=.004, decay_s=.0031, trim_db=-1, pan_db=.5)
    clicks = hits(PART_CLICKS, PART_CLICK_COLOUR, PART_CLICK_COLOUR,
                  rise_s=.000678, decay_s=.0044, trim_db=-8.5, pan_db=0, crack=.082)
    catches = hits(EDGE_CATCHES, BENCH_GRIP_4, STEEL_GRIP_4,
                   rise_s=.0047, decay_s=.0031, trim_db=-6.5, pan_db=1)
    taps = hits(FILE_TAPS, TAP_BENCH_COLOUR, TAP_STEEL_COLOUR,
                rise_s=.0005, decay_s=.0014, trim_db=-7.5, pan_db=2, crack=.26)
    near = handling() + knock + clicks + catches + taps + squeaks() + filing()
    return workshop() + gain_of(-25) * room(near) + echoes(near) + near


def record(dry):
    """The recorder's band limit: a steep low-pass filter."""
    low_pass = signal.firwin(511, RECORDER_EDGE_HZ, window=("kaiser", 9), fs=SR)
    return signal.oaconvolve(dry, low_pass[None], "same")


dry = scene()
out = record(dry)
generate_wav(out)
```